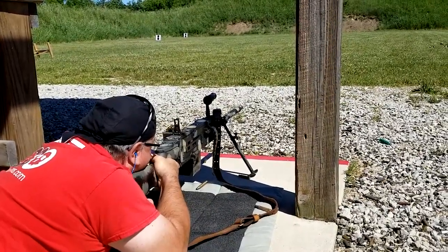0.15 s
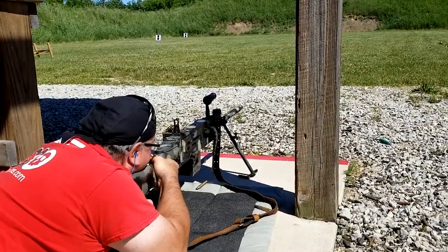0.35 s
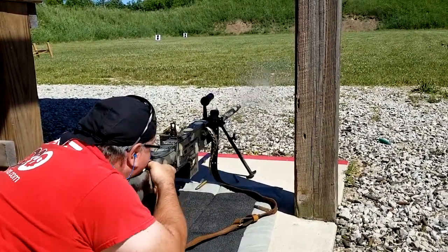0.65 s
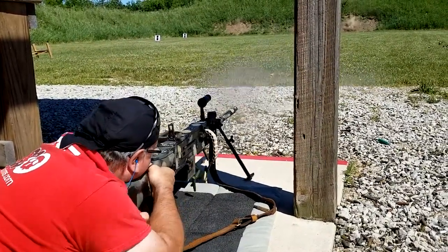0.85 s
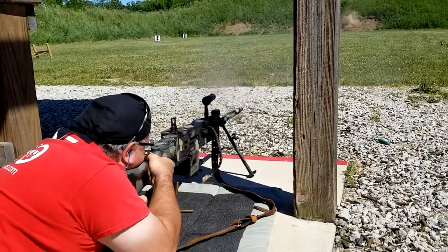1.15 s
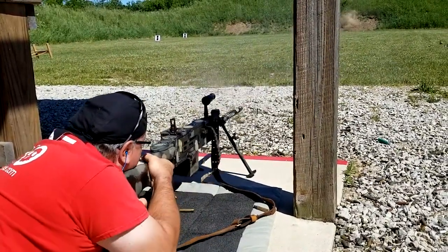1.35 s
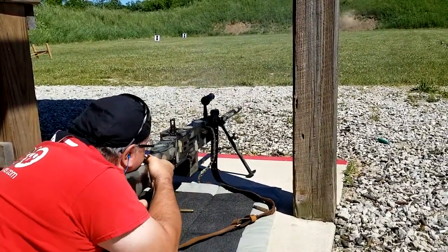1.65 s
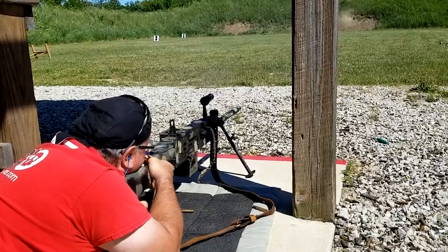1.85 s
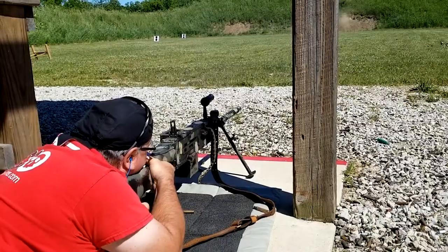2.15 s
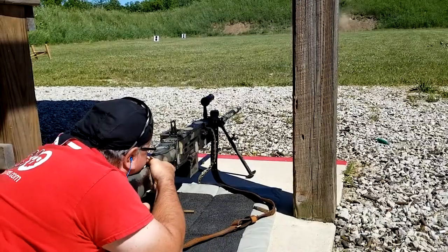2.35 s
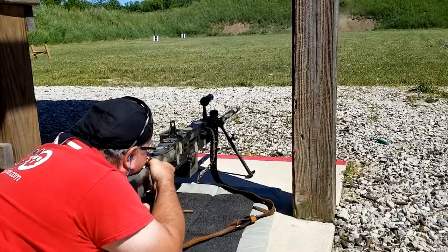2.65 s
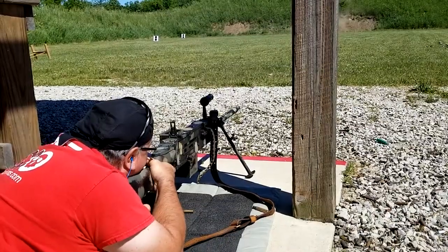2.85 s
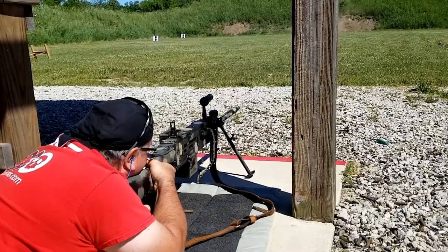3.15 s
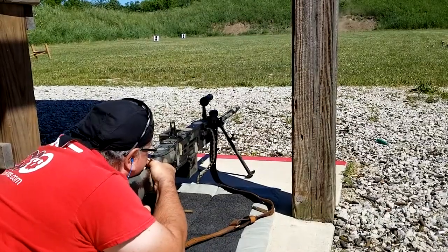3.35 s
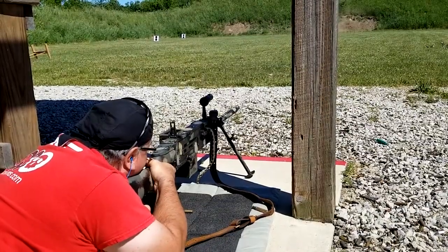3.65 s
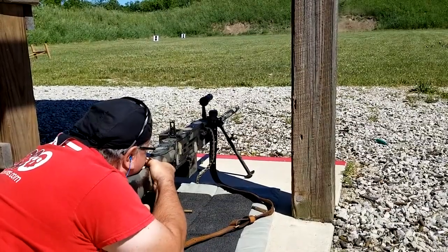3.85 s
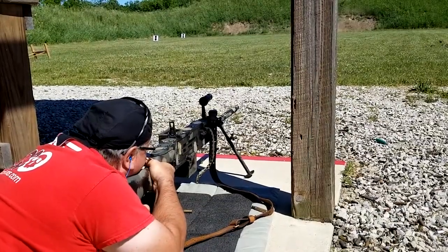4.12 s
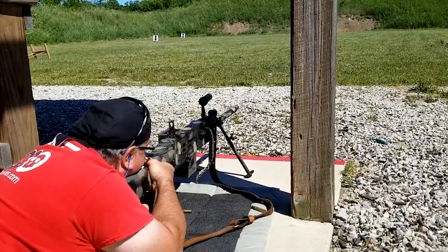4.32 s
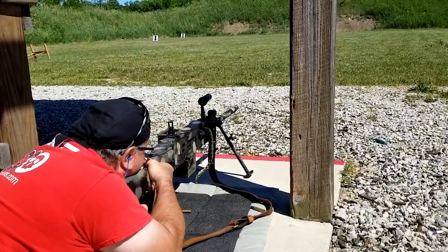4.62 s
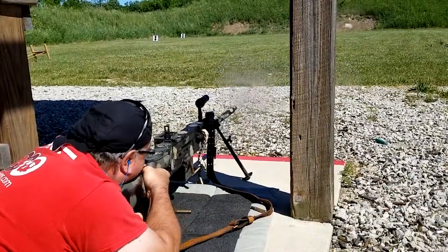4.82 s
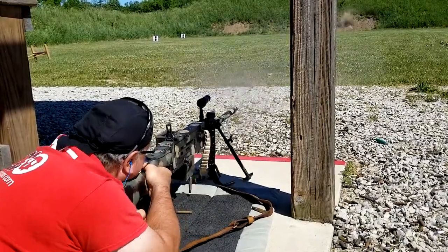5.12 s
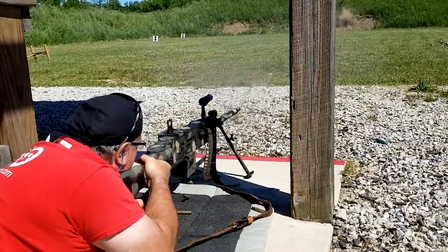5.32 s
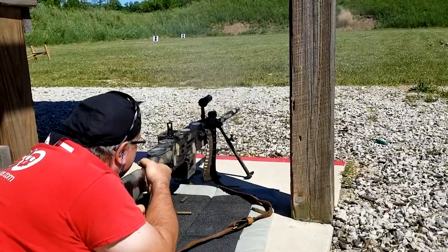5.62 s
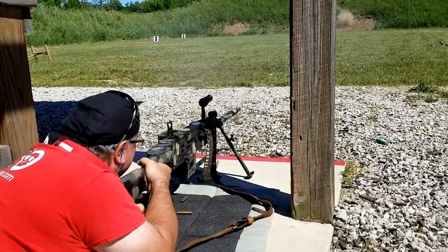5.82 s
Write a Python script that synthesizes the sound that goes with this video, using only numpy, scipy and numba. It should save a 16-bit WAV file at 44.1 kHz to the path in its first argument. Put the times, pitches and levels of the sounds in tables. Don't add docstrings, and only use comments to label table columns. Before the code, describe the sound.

Outdoors under a range roof, a phone microphone sits close to a belt-fed machine gun. Small metallic clicks open over faint air, then a deep, booming rifle shot at 0.15 s and a sharper, brighter carbine crack at 0.4 s. From about 0.57 to 0.85 s the machine gun hammers seven shots, some twenty a second, merging into a harsh, clipped roar. Its echo returns from earth banks and fades as spent cases ring high and thin on concrete from 1.0 to 1.8 s, over rustling leaves. A carbine cracks at 2.1 s; light rattles and a faint ping follow to 3 s. The rifle booms at 3.5 s, the carbine at 4.0 s. A second seven-shot burst runs from 4.7 to 5.0 s, then a hard metallic clack at 5.2 s, bright brass tinkles, and a last carbine shot at 5.6 s whose tail fades with a final small ping.

```python
import sys
import numpy as np
from scipy import signal
from scipy.fft import rfft, irfft, next_fast_len
from scipy.io import wavfile
from numba import njit

SR = 44100
rng = np.random.default_rng(int(sys.argv[2]) if len(sys.argv) > 2 else 0)


def wav_record(signal):
    frames = np.transpose(np.atleast_2d(signal))
    bounded = np.clip(frames, -1, 1)
    quanta = np.round(bounded * 32767).astype(np.int16)
    wavfile.write(sys.argv[1], SR, quanta)


def undo_db(level):
    steps = np.asarray(level, float) / 20
    return 10 ** steps


N = 263699
STRIDE = 8
SPAN, LEAD_S = 2 ** 16, .05
BANDS_HZ = 45 * 2 ** np.arange(0, 8.6, 2 / 3)


def on_log(table, hz):
    log_hz, values = np.log(np.array(table)[:, 0]), np.array(table)[:, 1]
    return np.interp(np.log(hz), log_hz, values)


def walk(rate, count, size):
    knots = rng.standard_normal((count, 2048))
    place = np.arange(0, size, STRIDE) * rate / SR % 2047
    return np.array([np.interp(place, np.arange(2048), row) for row in knots])


def held_amp(db, size):
    return np.repeat(undo_db(db), STRIDE, axis=-1)[..., :size]


def add(out, s, sound):
    i = int(round(s * SR))
    out[:, i:i + sound.shape[-1]] += sound[..., :N - i]


# f/Hz, share common to both [0..1]
PORT_COHERENCE = [(60, 0.74), (300, .85), (1200, 0.14), (2500, 0.055), (8000, 0.067)]
# f/Hz, level/dB
PORT_RESPONSE = [(5000, -0.5), (6800, -3), (8300, -12), (10000, -8), (13000, -1), (15300, -7),
                 (16300, -30.5)]


def noise_bands(colour, size, lag_s):
    hz = np.maximum(np.arange(size // 2 + 1) * SR / size, 1)
    common, left, right = rfft(rng.standard_normal((3, size)))
    like = np.clip(on_log(PORT_COHERENCE, hz), 0, 1)
    late = common * np.exp(-2j * np.pi * hz * lag_s)
    pair = np.sqrt(like) * np.array([common, late]) + np.sqrt(1 - like) * np.array([left, right])
    pair = pair * undo_db(on_log(colour, hz) + on_log(PORT_RESPONSE, hz))
    index = np.arange(len(BANDS_HZ))
    place = np.interp(np.log(hz), np.log(BANDS_HZ), index)
    share = np.clip(1 - abs(place - index[:, None, None]), 0, 1)
    bands = irfft(share * pair, size)
    return bands / np.std(bands.sum(axis=0))


# t/s, level/dB, tilt above the rumble [dB per octave]
AIR_LEVELS = [(0, -62, -2), (.05, -43, -7.5), (.139, -46, -4), (1.6, -59, -4.5), (2.1, -58, -5),
              (2.899, -65.5, -2), (3.201, -70.5, -3.5), (3.402, -67, -2.5), (3.52, -60.5, -1), (4, -64, -1),
              (4.65, -64, -3), (5.98, -74, -4.6)]
# f/Hz, density [dB per Hz]
AIR_SPECTRUM = [(25, -16.5), (150, -5), (250, -2.5), (600, -6), (1500, -8), (4300, -8), (7500, -12),
                (11500, -12.5), (16000, -29)]


def air():
    bands = noise_bands(AIR_SPECTRUM, next_fast_len(N), 0)[..., :N]
    s, *controls = np.transpose(AIR_LEVELS)
    level_db, tilt_db = (np.interp(np.arange(0, N, STRIDE) / SR, s, v) for v in controls)
    octaves = np.maximum(np.log2(BANDS_HZ / 400), 0)[:, None]
    flicker_db = 2.5 * walk(14, count=len(BANDS_HZ), size=N)
    db = level_db + tilt_db * octaves + flicker_db
    return (bands * held_amp(db + 5.5, N)[:, None]).sum(axis=0)


# t/s, peak level/dB,
# centre f/Hz, width f/Hz, t60/s
CLACKS = [(0.034, -39, 2010, 1500, .02), (.058, -42.5, 2716, 2410, .08), (0.126, -43, 3000, 509.7, .15),
          (1.152, -41, 2900, 2486, 0.023), (2.382, -39.5, 2380, 400, .05), (2.511, -49.5, 8700, 9000, .03),
          (2.966, -60, 6970, 8020, 0.083), (3.518, -47, 3040, 400, 0.1524), (5.15, -41, 3000, 3020, 0.027),
          (5.196, -23, 3950, 2000, 0.066), (5.199, -30.5, 6730, 6040, 0.04),
          (5.679, -36.5, 10260, 8060, .04)]


def knocks():
    out, t = np.zeros((2, N)), np.arange(SR // 5) / SR
    for s, db, hz, width, t60 in CLACKS:
        peak = signal.iirpeak(hz, max(hz / width, .8), fs=SR)
        once = signal.lfilter(*peak, rng.standard_normal((2, len(t))))
        ring = signal.lfilter(*peak, once)
        contact = np.minimum(t / 0.0018, 1)
        add(out, s, undo_db(db - 2.5 - 60 * t / t60) * contact * ring / np.std(ring))
    return out


# t/s, peak level/dB, lower ring f/Hz, upper ring f/Hz, upper minus lower level/dB
LANDINGS = [(.999, -40, 9860, 13600, -5), (1.12, -52, 9940, 13800, -2), (1.184, -48, 10300, 14900, -3),
            (1.23, -44, 10000, 14900, 0), (1.327, -49.5, 9950, 14200, -11), (1.418, -51, 10140, 14400, 2),
            (1.487, -56, 9900, 14400, 9), (1.563, -58, 9700, 14400, 1.5), (1.721, -65.5, 11510, 14640, -6),
            (1.8, -75, 9700, 14800, 7.5), (2.97, -50, 11720, 15000, -30), (4.359, -63, 12750, 14800, 0),
            (5.243, -35.5, 10180, 14600, -12), (5.29, -48.5, 9500, 14770, -8.5),
            (5.345, -50.5, 9710, 14400, -16), (5.43, -43, 9800, 14400, -8), (5.876, -46, 10080, 15000, 0)]


def cases():
    out, t = np.zeros((2, N)), np.arange(SR // 3) / SR
    split = np.array([1, 1.005, .982])[:, None, None]
    share = undo_db(np.array([0, -5, -9]))[:, None, None]
    ring_t60, tick_t60 = .33, .03
    phases = rng.uniform(0, 2 * np.pi, (len(LANDINGS), 3, 2, 1))
    for (s, db, low_hz, high_hz, high_db), phase in zip(LANDINGS, phases):
        low = (share * np.sin(2 * np.pi * low_hz * split * t + phase)).sum(axis=0)
        high = (share * np.sin(2 * np.pi * high_hz * split * t + phase)).sum(axis=0)
        ring = (low + undo_db(high_db) * high) * undo_db(-60 * t / ring_t60)
        tumble = held_amp(3.5 * walk(160, count=2, size=len(t)), len(t))
        tick_db = -13 + 0.75 * (-40 - db)
        tick = np.diff(rng.standard_normal((2, len(t) + 1))) * undo_db(tick_db - 6 - 60 * t / tick_t60)
        add(out, s, undo_db(db - 9) * (tumble * ring + tick))
    return out


def scatter_envelope(returns, damp):
    t = np.arange(0, SPAN, STRIDE) / SR - LEAD_S
    octave = np.log2(BANDS_HZ / 1000)[:, None]
    power = 0
    for delay, db, t60, centre_hz, fall_db in returns:
        rise = -delay if delay < 0 else min(.03 * t60, .0006 + delay)
        age = np.maximum(t - delay, 0)
        fade_db = -60 * np.maximum(age - rise, 0) / t60 * 2 ** (damp * octave)
        colour_db = -abs(fall_db) * np.log2(BANDS_HZ[:, None] / centre_hz) ** 2
        onset = np.minimum(age / rise, 1) ** 2
        power = power + (onset * undo_db(db + colour_db + fade_db)) ** 2
    travel_db = -17 * np.maximum(t, 0) * 4 ** octave / 100
    patchy_db = 1.0 * walk(45, count=1, size=SPAN) + 2.0 * walk(80, count=len(BANDS_HZ), size=SPAN)
    crackle_db = 2.5 * walk(700, count=1, size=SPAN)
    level = np.sqrt(power) * undo_db(travel_db + patchy_db + crackle_db)
    return np.repeat(level, STRIDE, axis=1)[:, None]


def shock_fronts(fronts, lag_s):
    t = np.arange(SPAN) / SR - LEAD_S - np.array([[0], [lag_s]])
    wave = 0
    for delay, db, length in fronts:
        u = (t - delay) / length
        wave = wave + undo_db(db) * np.where((u >= 0) & (u < 1), 1 - 2 * u, 0)
    rounding = signal.butter(2, (310, 2400), "bandpass", fs=SR, output="sos")
    return signal.sosfilt(rounding, wave)


# f/Hz, share alike from shot to shot [0..1]
SHOT_LIKENESS = [(200, 0.96), (1200, 0.65), (4000, 0.41), (10000, 0.2)]
# lag of right port [s], left minus right level/dB, treble damping of decays [exponent]
GUN_PORTS = [
    (.00023, 0.03, .03),
    (.0003, 0.5, 0.02),
    (.00039, 0, .03),
]
SHOCK_GAINS = [
    -2.3,
    1.7,
    1.5,
]


def gun(which, shots, colour, fronts, returns):
    lag_s, pan_db, damp = GUN_PORTS[which]
    envelope = scatter_envelope(returns, damp)
    bands = noise_bands(colour, SPAN, lag_s)
    alike = np.clip(on_log(SHOT_LIKENESS, BANDS_HZ), 0, 1)[:, None, None]
    fixed = (np.sqrt(alike) * envelope * bands).sum(axis=0)
    fixed = fixed + SHOCK_GAINS[which] * shock_fronts(fronts, lag_s)
    fresh = []
    for k in (1, 2):
        shifted = np.roll(bands, k * SPAN // 3, axis=2)
        fresh.append((np.sqrt(1 - alike) * envelope * shifted).sum(axis=0))
    out = np.zeros((2, N))
    for (s, db), turn in zip(shots, rng.uniform(0, 2 * np.pi, len(shots))):
        renewed = np.cos(turn) * fresh[0] + np.sin(turn) * fresh[1]
        add(out, s - LEAD_S, undo_db(db) * (fixed + renewed))
    return out * undo_db(np.array([[pan_db], [-pan_db]]) / 2)


# t/s, level/dB
CARBINE_SHOTS = [
    (.3944, 0.0085),
    (2.1343, 0.043),
    (4.0229, 0),
    (5.5888, 0),
]
# f/Hz, density [dB per Hz]
CARBINE_SPECTRUM = [(40, -39), (130, -21.5), (280, -7), (600, -5), (1100, -7.5), (1600, -6.5), (2500, -7.5),
                    (4500, -8.5), (16000, -20)]
# delay t/s, peak level/dB, length t/s
CARBINE_SHOCKS = [
    (0, 0, .0008),
    (.0011, -2, .0007),
    (.0033, -2, .001),
    (.009, -5, .001),
    (.0245, -10, .0014),
]
# delay t/s, rms level/dB, t60/s, centre f/Hz, fall one octave off centre [dB]
CARBINE_PATHS = [(.001, -8, .08, 7000, .5), (.005, -15.5, .33, 2500, .2), (.003, -11, .3, 900, 6),
                 (.018, -9, .2, 800, 7), (.034, -8, .17, 750, 7), (.048, -12, .15, 700, 7),
                 (.088, -27, .1, 4000, .2), (.15, -41, .75, 2500, .3), (.325, -47, .3, 2500, .6),
                 (.451, -39, .25, 850, 8), (.455, -54, .8, 2500, .5), (.63, -52, .5, 800, 4)]


def carbine():
    return gun(2, CARBINE_SHOTS, CARBINE_SPECTRUM, CARBINE_SHOCKS, CARBINE_PATHS)


# t/s, level/dB
RIFLE_SHOTS = [
    (.1543, 0.0073),
    (3.5434, 0),
]
# f/Hz, density [dB per Hz]
RIFLE_SPECTRUM = [(40, -31.5), (130, -14.5), (280, -5), (450, -3), (800, -8), (1200, -12.5), (1900, -9.5),
                  (3000, -15), (5500, -18.5), (16000, -33.5)]
# delay t/s, peak level/dB, length t/s
RIFLE_SHOCKS = [
    (0, 0, .0024),
    (.0042, -4, .0014),
    (.008, -2, .0016),
    (.0128, -4, .0018),
    (.0255, -4, .0014),
    (.0443, -3, .0018),
]
# delay t/s, rms level/dB, t60/s, centre f/Hz, fall one octave off centre [dB]
RIFLE_PATHS = [
    (-.04, -40, 0.25, 350, 2),
    (.002, -4, .32, 1000, 0.065),
    (.075, -13, 0.36, 1500, 0.12),
    (.195, -25.5, .3, 4045, 3.8),
    (0.223, -21.5, 0.29, 4000, 2),
    (.33, -37.5, .9, 3000, 1),
    (.15, -44, 1.6, 200, 1.4),
]


def rifle():
    return gun(1, RIFLE_SHOTS, RIFLE_SPECTRUM, RIFLE_SHOCKS, RIFLE_PATHS)


# t/s, level/dB
BELT_SHOTS = [(.5721, -1.5), (.6206, -3), (.6636, -2), (.7081, 0), (.7509, 1.5), (.7979, 0), (.8444, -6.5),
              (4.6877, 4), (4.7377, -1.5), (4.783, -2.5), (4.8273, -5.5), (4.8716, 2.5), (4.9172, 2),
              (4.9647, -9)]
# f/Hz, density [dB per Hz]
BELT_SPECTRUM = [(40, -32), (120, -22), (190, -13.5), (255, -2.5), (400, -11.5), (550, -7.5), (800, -7),
                 (1100, -15), (2100, -11), (4500, -14), (16000, -17)]
# delay t/s, peak level/dB, length t/s
BELT_SHOCKS = [
    (.0107, 0, .0024),
    (.0133, -1, .0014),
    (.0148, -1, .0019),
    (.0169, -1, .0018),
    (.0189, -2, .0015),
    (.0213, -2, .001),
    (.0312, -5, .0016),
]
# delay t/s, rms level/dB, t60/s, centre f/Hz, fall one octave off centre [dB]
BELT_PATHS = [(-.005, -20, .021, 4050, -0.5), (0, -1, 0.17, 12130, 1.5), (0, -5.5, .08, 906, 2.5),
              (.008, 0.5, .2, 2448, 0.2), (.026, -7.5, 0.13, 3000, 0.2), (.018, -5, .25, 2102, 22.5),
              (0.024, -10.5, 0.33, 600, .5), (0.13, -10.5, .12, 330, 7), (.1, -31.5, 1.8, 260, 10),
              (.17, -35.5, 1.1, 3500, 2), (.43, -45.5, 1.69, 1920, 3)]


def belt_gun():
    return gun(0, BELT_SHOTS, BELT_SPECTRUM, BELT_SHOCKS, BELT_PATHS)


def scene():
    return air() + knocks() + cases() + carbine() + rifle() + belt_gun()


@njit
def follow(x, attack, release):
    e, out = 0., np.empty(len(x))
    for i in range(len(x)):
        e += (x[i] - e) * (attack if x[i] > e else release)
        out[i] = e
    return out


def band_limit(x):
    return signal.sosfilt(signal.butter(12, 16500, fs=SR, output="sos"), x)


def record(dry):
    dry = signal.sosfilt(signal.butter(2, 45, "highpass", fs=SR, output="sos"), dry)
    attack_s, release_s = .0012, .008
    envelope = follow(abs(dry).max(axis=0), 1 / (attack_s * SR), 1 / (release_s * SR))
    held = dry * np.minimum(undo_db(-5) / (envelope + 1e-9), 1) ** 1.017
    rounded = np.tanh(1.063 * held) / np.tanh(1.1) * 0.86
    rounded = signal.sosfilt(signal.ellip(6, .3, 50, 16300, fs=SR, output="sos"), rounded)
    return band_limit(rounded)


dry = scene()
out = record(dry)
wav_record(out)
```